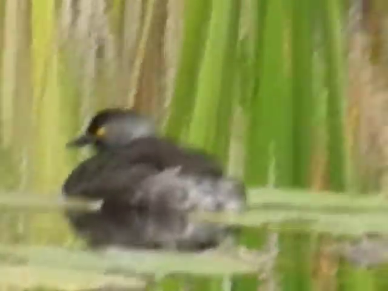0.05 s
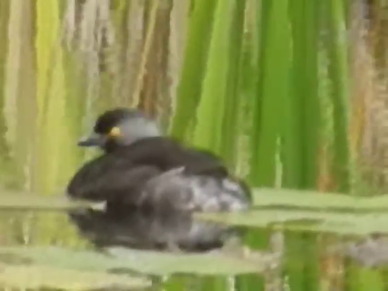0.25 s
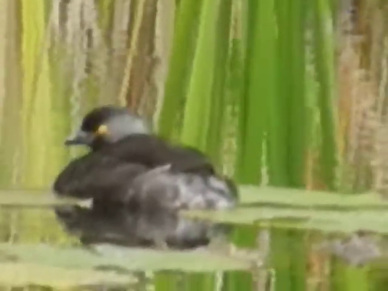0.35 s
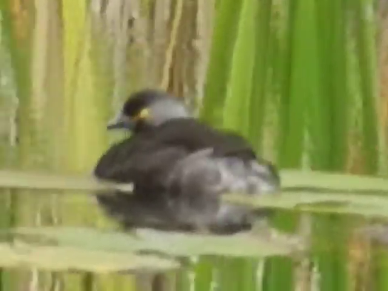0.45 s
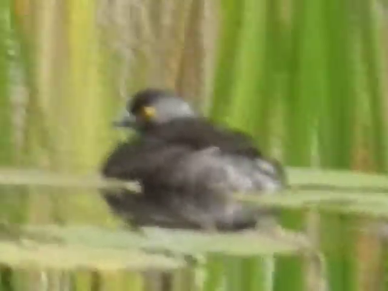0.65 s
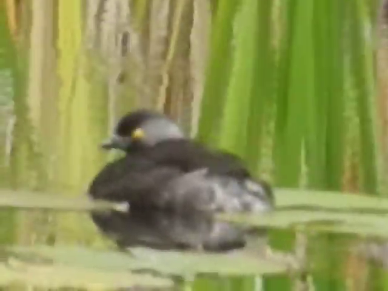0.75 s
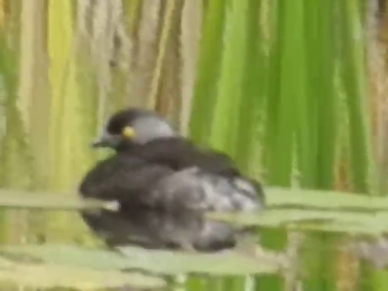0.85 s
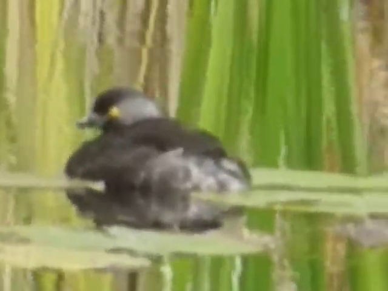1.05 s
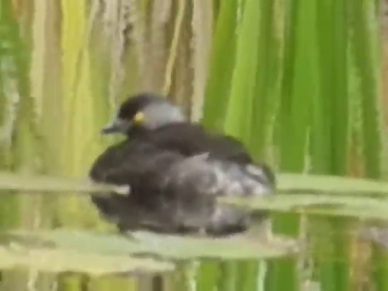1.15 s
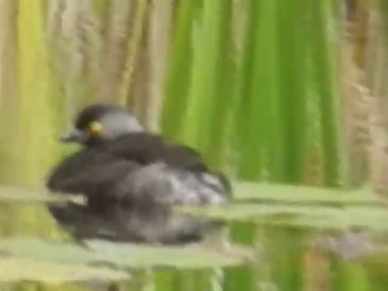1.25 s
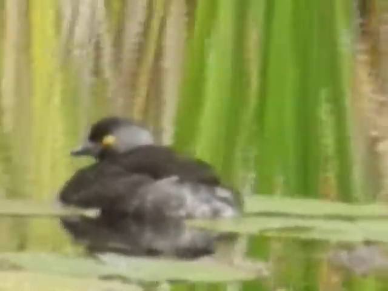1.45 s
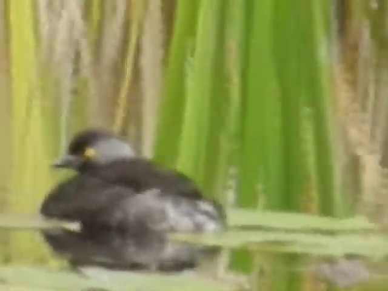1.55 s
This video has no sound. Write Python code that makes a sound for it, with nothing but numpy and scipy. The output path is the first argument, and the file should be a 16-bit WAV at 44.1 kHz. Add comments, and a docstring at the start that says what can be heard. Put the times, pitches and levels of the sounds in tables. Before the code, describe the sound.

Gusting wind rumbles on the microphone, with faint crickets and one distant bird whistle.

```python
"""A soft outdoor wash and the fast wing trills of crickets surround a reedy pond throughout.
Right at the start, a hollow far-off sound rises and sinks.
A gust of wind builds and buffets the microphone with rumble, flutter and small thumps.
As it dies away, a distant bird gives one thin whistle that turns raspy and drops."""
import sys
import numpy as np
from scipy import signal
from scipy.fft import rfft, irfft
from scipy.io import wavfile

SR = 44100
rng = np.random.default_rng(int(sys.argv[2]) if len(sys.argv) > 2 else 0)


def log_audio(samples):
    """Write samples as a 16-bit WAV file to the path given in sys.argv[1]."""
    # one column per channel
    frames = np.atleast_2d(samples).T
    # limit to full scale, then quantise
    limited = np.clip(frames, -1, 1)
    pcm = np.round(limited * 32767).astype(np.int16)
    wavfile.write(sys.argv[1], SR, pcm)


N = 70560  # 1.6 seconds


def amp(db):
    """Turns decibels into a number to multiply by."""
    return 10 ** (np.asarray(db) / 20)


def unit(x):
    """Scales a signal to an average strength (rms) of 1."""
    return x / np.sqrt(np.mean(x ** 2) + 1e-20)


def over_time(table, column=1):
    """Joins a table's points into one value per sample."""
    columns = np.transpose(table)
    return np.interp(np.arange(N) / SR, columns[0], columns[column])


def over_pitch(table):
    """Joins a table's points into one value per frequency."""
    hz, value = np.transpose(table)
    return np.interp(np.log(np.fft.rfftfreq(N, 1 / SR) + 1), np.log(hz + 1), value)


def wander(hz):
    """A random wobble of strength 1, mostly slower than hz."""
    f = np.fft.rfftfreq(N, 1 / SR)
    keep_slow = np.exp(-.5 * (f / hz) ** 2) * (f > 0)
    return unit(irfft(rfft(rng.standard_normal(N)) * keep_slow, N))


def stereo_noise(colour, likeness):
    """Shaped noise whose left and right are alike (1), unrelated (0) or opposite (-1)."""
    a, b = rfft(rng.standard_normal((2, N)))
    likeness = np.clip(likeness, -1, 1)
    shared, opposed = a * np.sqrt(1 + likeness), b * np.sqrt(1 - likeness)
    left_right = np.array([shared + opposed, shared - opposed])
    return unit(irfft(left_right * amp(over_pitch(colour)), N))


def pan(x, left_over_right_db):
    """Places a sound between left and right."""
    return x * unit(amp([[left_over_right_db / 2], [-left_over_right_db / 2]]))


# How strong the wash is from low to high: pitch_hz, relative_db
WASH_COLOUR = [(20, -29), (80, 9), (200, 1), (350, 4), (500, -1.5), (750, -0.5), (1000, -5), (1500, -8),
               (2500, -16), (4000, -17.5), (9500, -19.5), (12500, -21.5), (16000, -27)]
# How alike distant sound is on the left and right: pitch_hz, likeness
FAR_LIKENESS = [(100, 0.77), (400, 0.57), (900, 0.6), (2000, .2), (4000, -0.12), (7500, .1), (11000, -0.32),
                (16000, -0.05)]

def wash():
    """Distant air and reeds, gently swelling."""
    level_db = -49.5 + 0.5 * wander(hz=2.3)
    return amp(level_db) * stereo_noise(WASH_COLOUR, over_pitch(FAR_LIKENESS))


# The hollow tone of the swell: pitch_hz, relative_db
SWELL_COLOUR = [(400, -32), (620, 10), (750, -2), (860, 4), (1050, -27), (1600, -35)]

def far_swell():
    """A hollow band of distant noise rises and sinks once."""
    peak_s, width_s = 0.18, 0.075
    arch = np.exp(-.5 * ((np.arange(N) / SR - peak_s) / width_s) ** 2)
    return amp(-56) * arch * stereo_noise(SWELL_COLOUR, over_pitch(FAR_LIKENESS))


# The hiss of many far crickets: pitch_hz, relative_db
CHORUS_COLOUR = [(4000, -14.5), (5100, -2.5), (5750, 3.5), (6450, -7.5), (7250, -1), (8200, 1.5),
                 (8600, -2.5), (9050, -2.5), (9500, -19), (11000, -47)]
# One near cricket a row: start_s, strokes_per_s, stroke_s, top_pitch_hz, level_db, left_over_right_db
NEAR_CRICKETS = [(0.00434, 42.03, 0.02, 7760, -63, 1.5), (0.0184, 49, 0.01, 9050, -69, 42),
                 (0.0092, 46.9, 0.011, 5850, -71.5, -1)]

def crickets():
    """Each wing stroke is a short rise and fall in pitch; far trills merge into a hiss."""
    sag, jitter = 0.15, 0.00643  # shares of the top pitch
    out = amp(-58) * stereo_noise(CHORUS_COLOUR, likeness=0.16)
    for start_s, strokes_per_s, stroke_s, top_pitch_hz, level_db, left_over_right_db in NEAR_CRICKETS:
        age_s = (np.arange(N) / SR - start_s) % (1 / strokes_per_s)
        progress = np.minimum(age_s / stroke_s, 1)
        off_centre = (2 * progress - 1) ** 2  # 0 mid-stroke, 1 at the ends
        pitch_hz = top_pitch_hz * (1 - sag * off_centre + jitter * wander(hz=290))
        trill = (1 - off_centre) ** .5 * np.sin(2 * np.pi * np.cumsum(pitch_hz) / SR)
        out += pan(amp(level_db) * unit(trill), left_over_right_db)
    return out


def reed_echo(x, fade_s=.12):
    """Reeds and water scatter a short echo that falls 60 dB in fade_s."""
    t = np.arange(SR // 2) / SR
    tail = rng.standard_normal((2, len(t))) * np.exp(-np.log(1000) * t / fade_s)
    return signal.fftconvolve(x[None], tail / np.linalg.norm(tail[0]), axes=1)[:, :N]


# The course of the bird's call: time_s, pitch_hz, level_db, rasp (0 pure to 1 hoarse)
BIRD_CALL = [(1.09, 2500, -76, .8), (1.14, 2800, -67, .8), (1.182, 2930, -68, .4),
             (1.202, 2985, -54.5, .04), (1.29, 3020, -54, .08), (1.325, 3015, -52, .3),
             (1.41, 3015, -52.5, .55), (1.485, 2965, -53, .3), (1.54, 2830, -59, .7), (1.59, 2480, -68, .7)]

def bird():
    """A wavering pure tone; as the voice roughens it buzzes and a rasp joins just above it."""
    waver_hz, buzz_hz, rasp_above_hz, rasp_width_hz = 89, 194.3, 150, 160
    pitch_hz, level_db, rasp = (over_time(BIRD_CALL, column) for column in (1, 2, 3))
    phase = 2 * np.pi * np.cumsum(pitch_hz * (1 + 0.011 * wander(waver_hz))) / SR
    buzz_phase = 2 * np.pi * np.cumsum(buzz_hz * (1 + .12 * wander(waver_hz))) / SR
    tone = np.sin(phase) + 0.8 * rasp * np.sin(phase + buzz_phase)
    rasp_phase = 2 * np.pi * np.cumsum(pitch_hz + rasp_above_hz * rasp ** .5) / SR
    hoarse = wander(rasp_width_hz) * np.cos(rasp_phase) + wander(rasp_width_hz) * np.sin(rasp_phase)
    voice = np.sqrt(1 - rasp) * unit(tone) + np.sqrt(rasp) * unit(hoarse)
    started = np.arange(N) / SR > BIRD_CALL[0][0]
    call = started * amp(level_db) * voice
    return pan(call, left_over_right_db=-9) + amp(-10.5) * reed_echo(call)


# Small whirls of air: time_s, strength_db, half_width_s, side (negative left, positive right)
WHIRLS = [(0.254, -20.5, 0.0022, -1.3), (0.311, -8.5, 0.0024, -0.0067), (0.414, -17.5, 0.0014, -1.1),
          (.611, -9.5, 0.0021, 1), (0.65, -10, 0.0021, -1.1), (.698, -18.5, 0.0017, -1.3),
          (0.806, -11, .0029, .6), (.870, -10, 0.0027, -0.97), (0.902, -5, 0.0017, 1),
          (0.918, -6, 0.0013, 0.89), (.962, -11.5, .0017, 1)]

def wind_thumps():
    """Each passing whirl sucks briefly at the microphone, with a push before and after."""
    spill = 0.39  # share that pushes on the opposite side
    low_cut_hz = 47  # the microphone passes little below this
    out = np.zeros((2, N))
    for time_s, strength_db, half_width_s, side in WHIRLS:
        offset = (np.arange(N) / SR - time_s) / half_width_s
        suction = amp(strength_db) * (offset ** 2 - 1) * np.exp(-.5 * offset ** 2)
        share = np.clip([[(1 - side) / 2], [(1 + side) / 2]], 0, 1)
        out += suction * (share - spill * share[::-1])
    low_cut = signal.butter(2, low_cut_hz, "highpass", fs=SR, output="sos")
    return signal.sosfiltfilt(low_cut, out)


# How hard the slow, heavy swirls press on the microphone: time_s, relative_db
RUMBLE_STRENGTH = [(0, -52.5), (.05, -48), (.085, -38.5), (.165, -53), (.205, -35), (.27, -33.5),
                   (.35, -25.5), (.42, -29.5), (.47, -28), (.54, -26.5), (.67, -32.5), (.765, -35),
                   (.86, -32.5), (.945, -27), (1.03, -33.5), (1.14, -40.5), (1.27, -39.5), (1.325, -66),
                   (1.38, -45), (1.52, -52.5), (1.6, -67)]
# Their deep tone: pitch_hz, relative_db
RUMBLE_COLOUR = [(15, -54), (30, -18), (45, -19), (57, -4), (70, 0), (110, -0.5), (150, -11.5), (220, -28),
                 (400, -73), (900, -83)]
# How loud the finer flutter is: time_s, level_db
FLUTTER_STRENGTH = [(0, -71), (.18, -60), (.25, -44.5), (.40, -32.5), (.46, -39.5), (.60, -31.5),
                    (.78, -41.5), (.855, -33.5), (.915, -25), (.99, -43.5), (1.07, -43), (1.14, -41.5),
                    (1.23, -58), (1.6, -63)]
# Its slightly higher tone: pitch_hz, relative_db
FLUTTER_COLOUR = [(50, -6.5), (110, -1.5), (190, -1), (270, -12), (360, -25), (480, -28.5), (900, -60),
                  (2500, -72)]

def wind():
    """Swirling air pushes one side of the microphone as it pulls the other, rumbling and fluttering."""
    likeness, lump_db, rumble_boost_db = -0.53, 1.6, 1.5
    lumps = unit(amp(lump_db * wander(hz=27.3)))
    rumble = amp(over_time(RUMBLE_STRENGTH) + rumble_boost_db) * stereo_noise(RUMBLE_COLOUR, likeness)
    flutter = amp(over_time(FLUTTER_STRENGTH)) * stereo_noise(FLUTTER_COLOUR, likeness)
    return pan(rumble + flutter * lumps, left_over_right_db=0.86)


def scene():
    """Wind at the microphone over the sounds of the pond."""
    return wind() + wind_thumps() + wash() + far_swell() + crickets() + bird()


def record(dry, top_hz=15780):
    """The recorder cuts off the very highest treble."""
    treble_cut = signal.firwin(511, top_hz, window=("kaiser", 9), fs=SR)
    return signal.oaconvolve(dry, treble_cut[None], "same")


dry = scene()
out = record(dry)
log_audio(out)
```